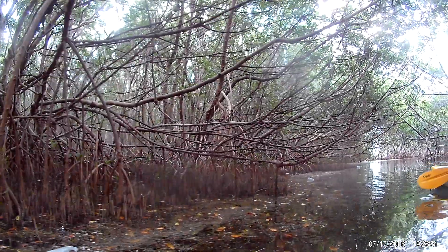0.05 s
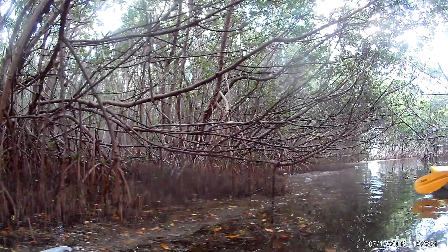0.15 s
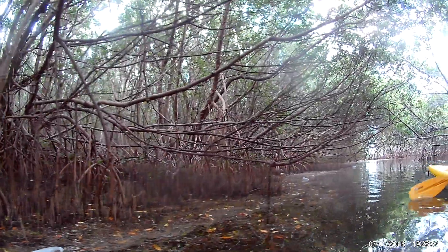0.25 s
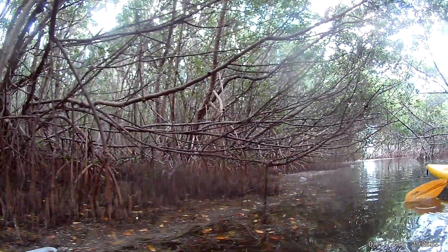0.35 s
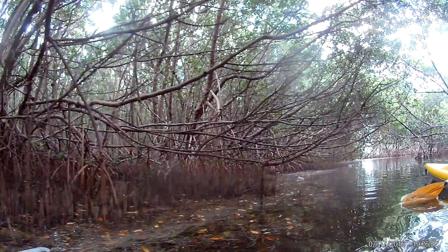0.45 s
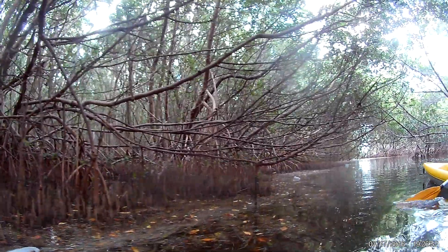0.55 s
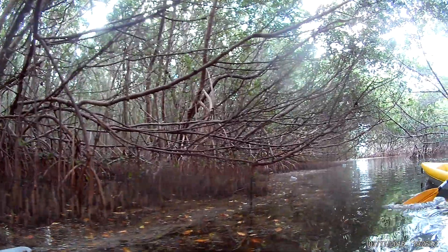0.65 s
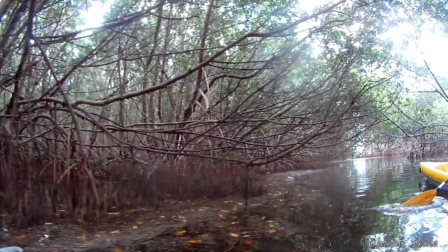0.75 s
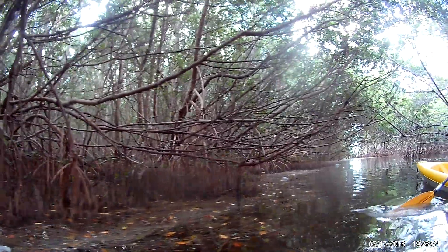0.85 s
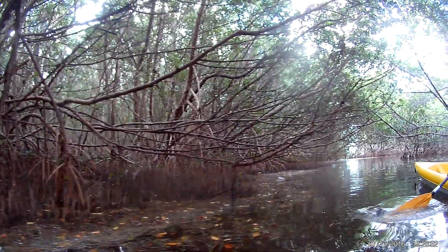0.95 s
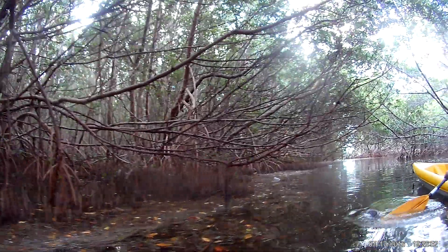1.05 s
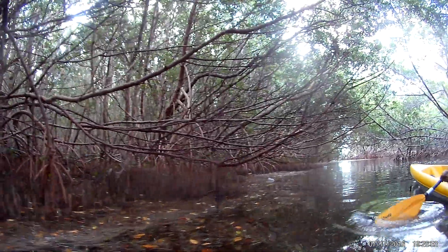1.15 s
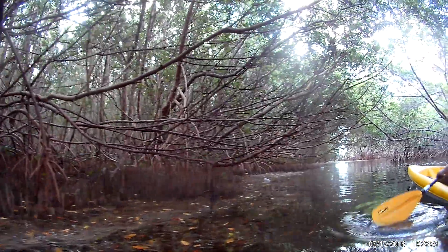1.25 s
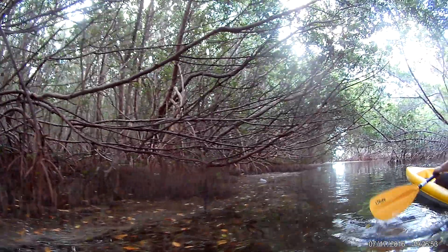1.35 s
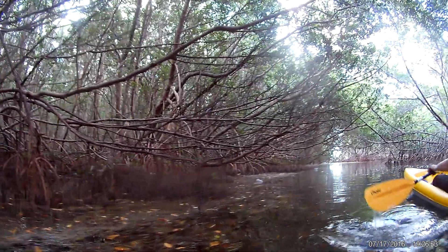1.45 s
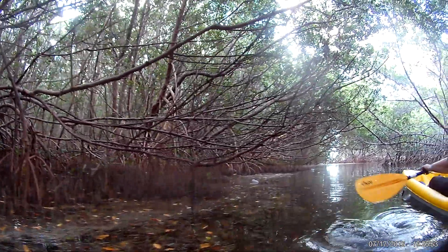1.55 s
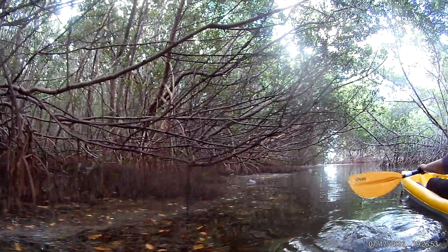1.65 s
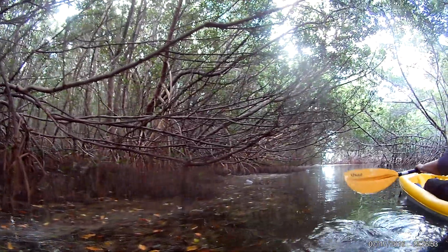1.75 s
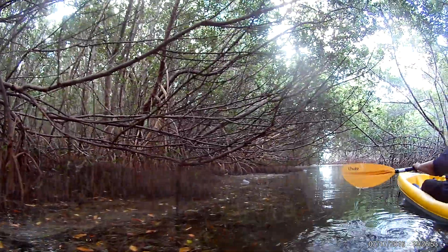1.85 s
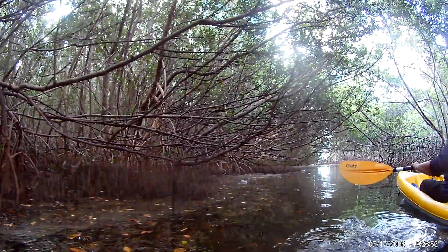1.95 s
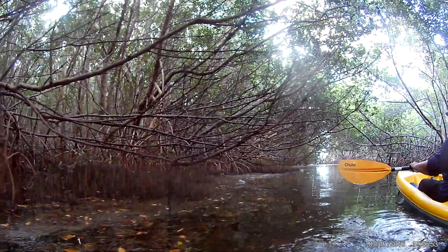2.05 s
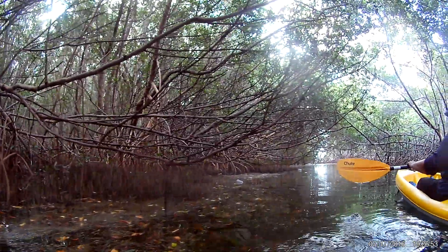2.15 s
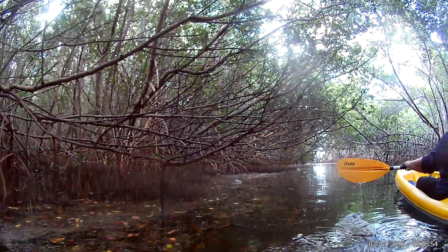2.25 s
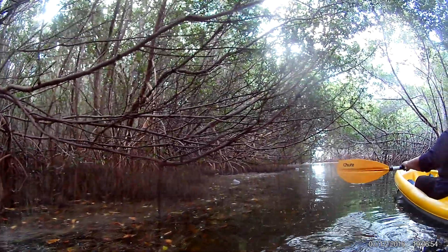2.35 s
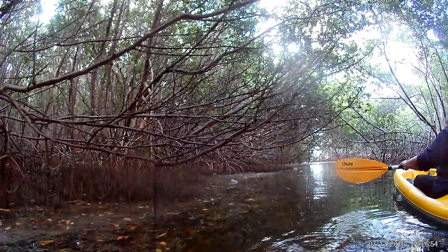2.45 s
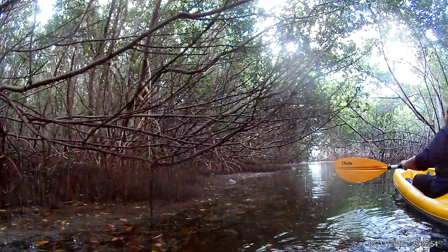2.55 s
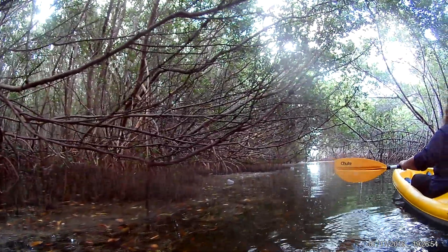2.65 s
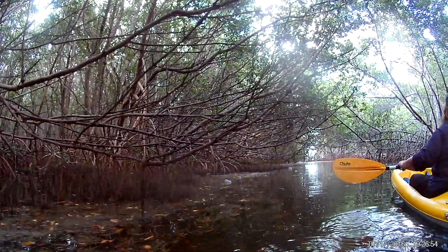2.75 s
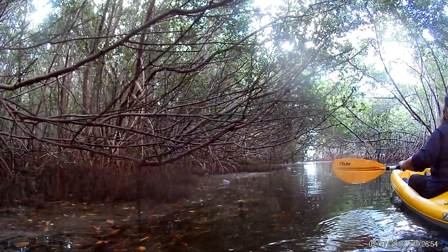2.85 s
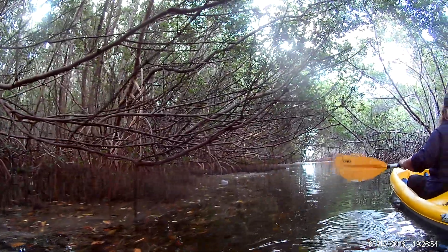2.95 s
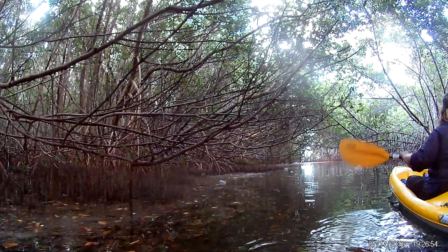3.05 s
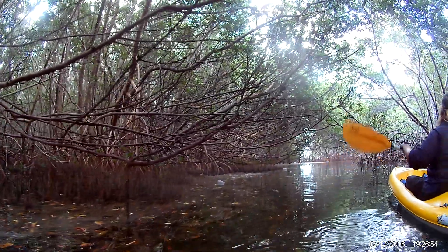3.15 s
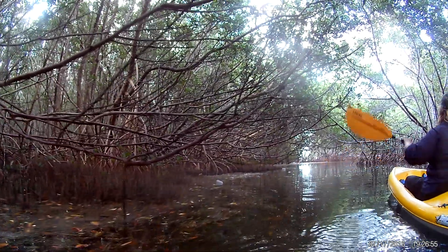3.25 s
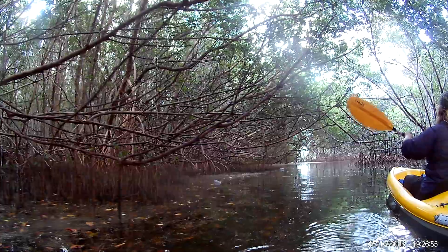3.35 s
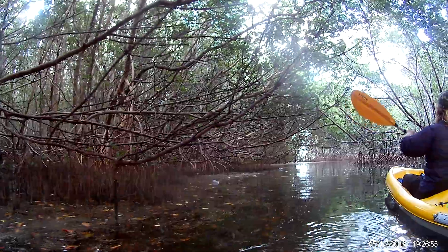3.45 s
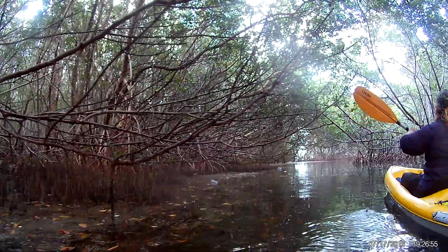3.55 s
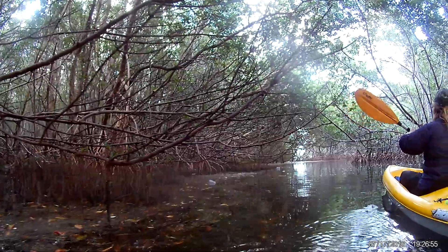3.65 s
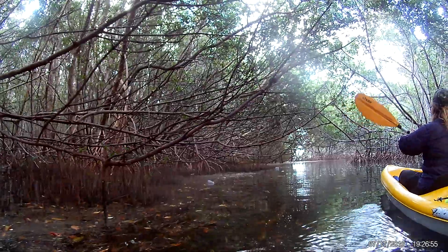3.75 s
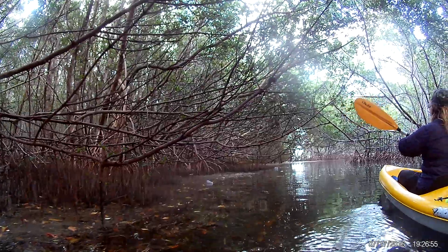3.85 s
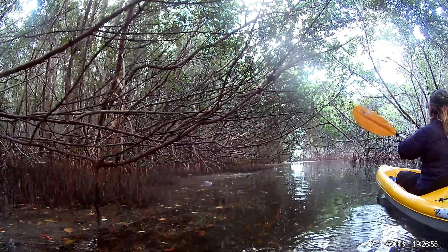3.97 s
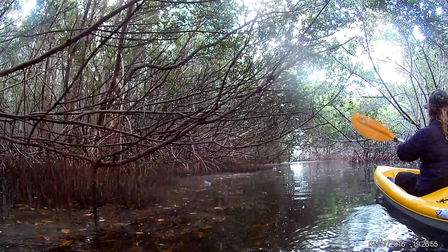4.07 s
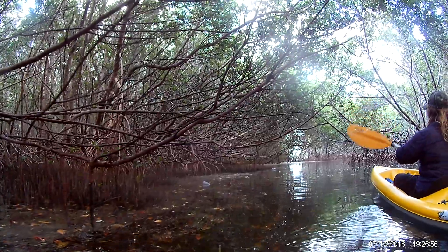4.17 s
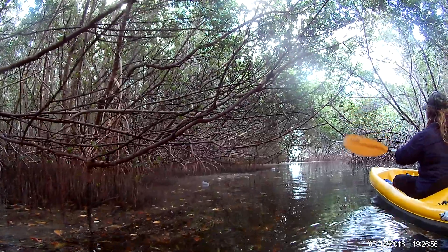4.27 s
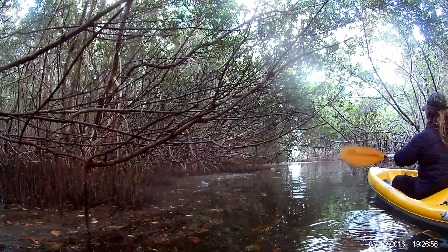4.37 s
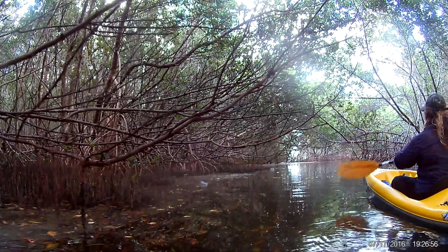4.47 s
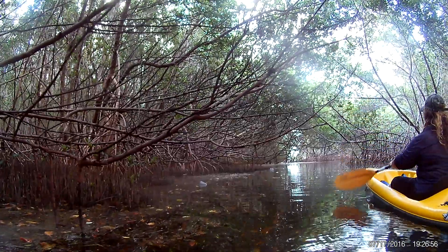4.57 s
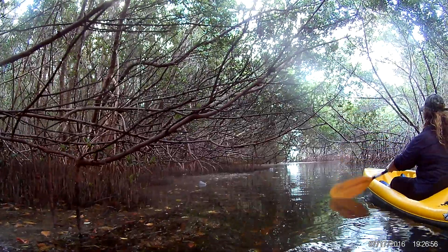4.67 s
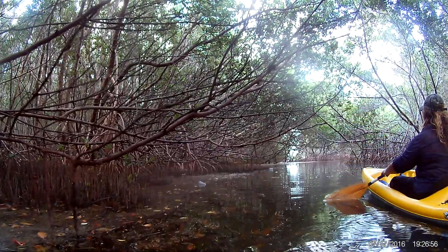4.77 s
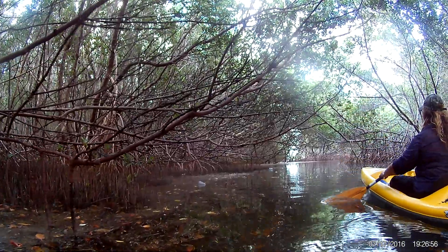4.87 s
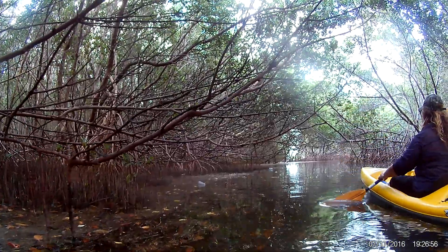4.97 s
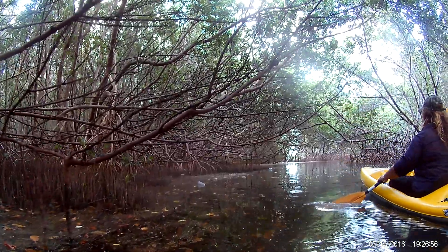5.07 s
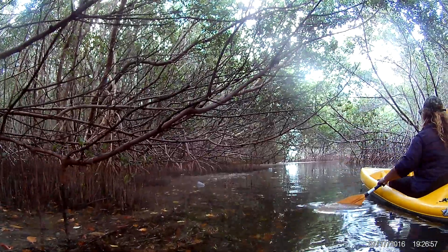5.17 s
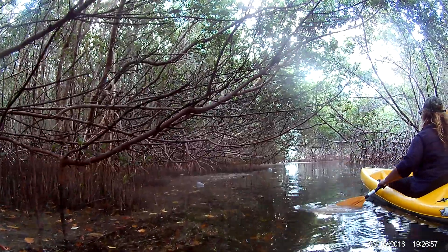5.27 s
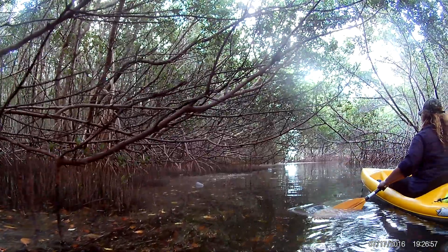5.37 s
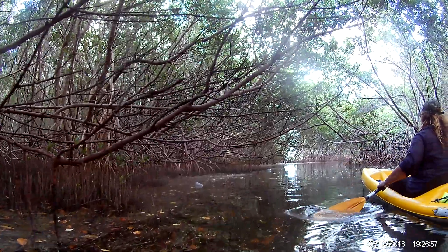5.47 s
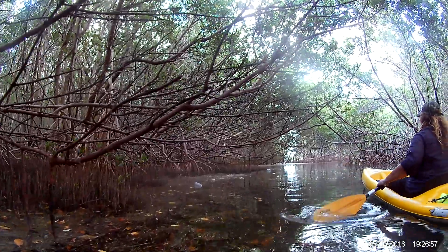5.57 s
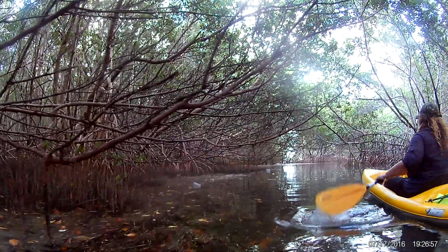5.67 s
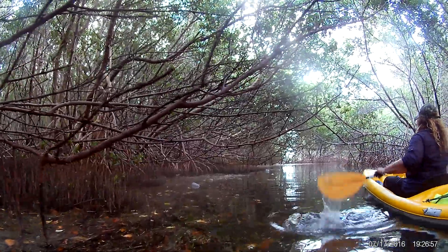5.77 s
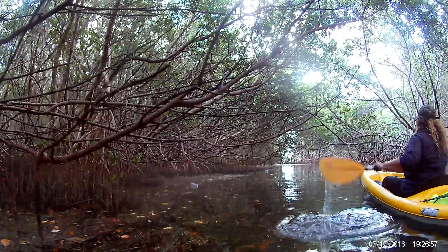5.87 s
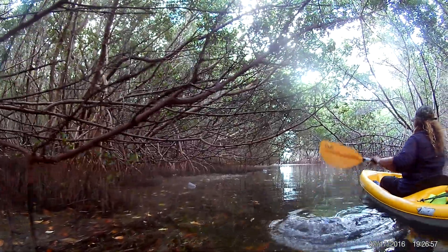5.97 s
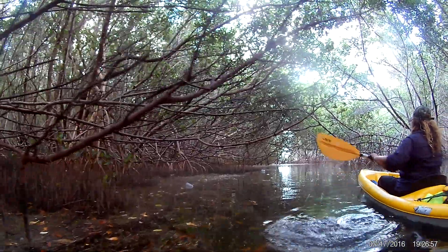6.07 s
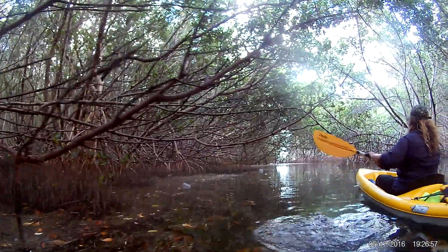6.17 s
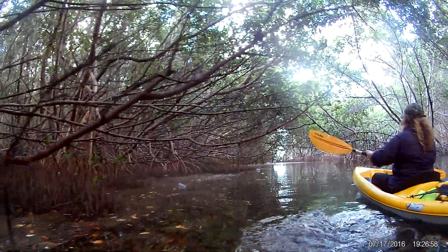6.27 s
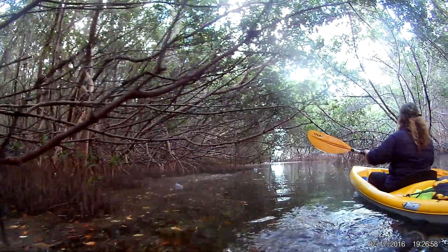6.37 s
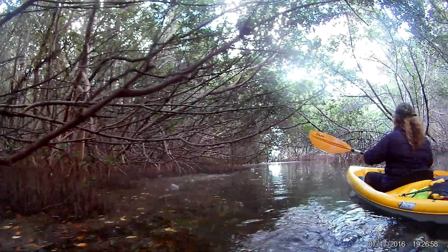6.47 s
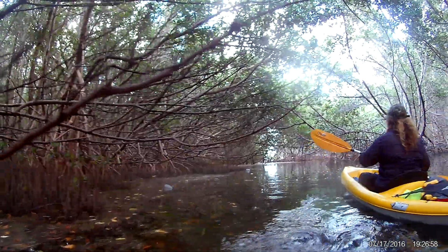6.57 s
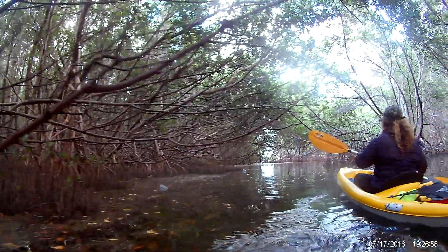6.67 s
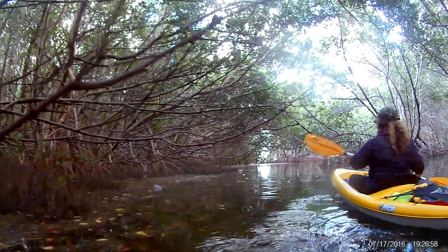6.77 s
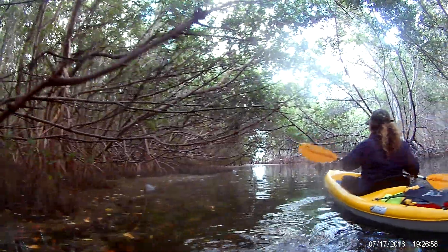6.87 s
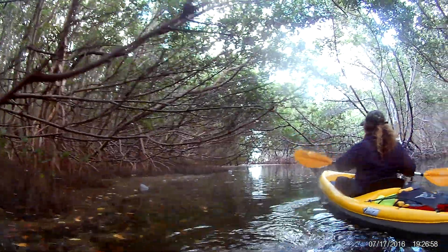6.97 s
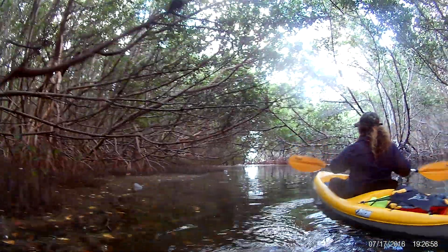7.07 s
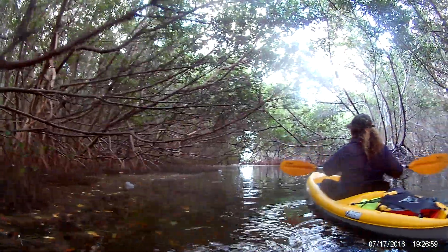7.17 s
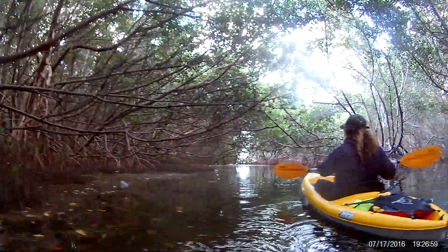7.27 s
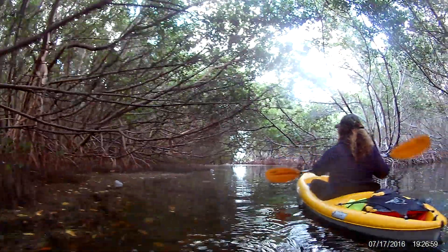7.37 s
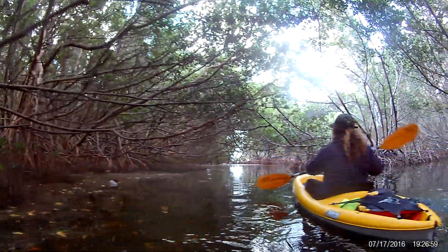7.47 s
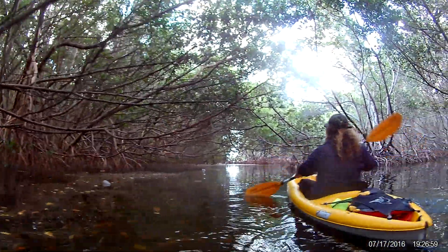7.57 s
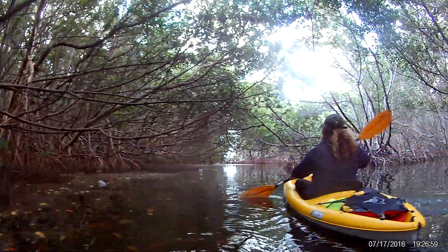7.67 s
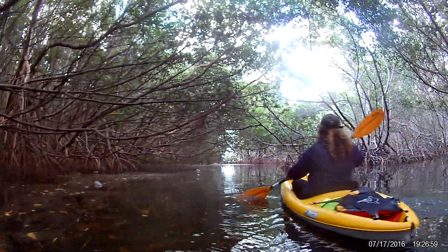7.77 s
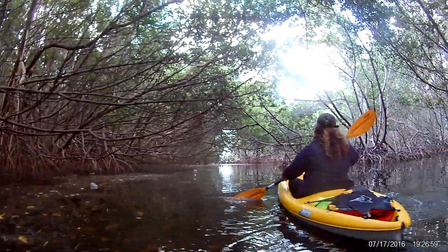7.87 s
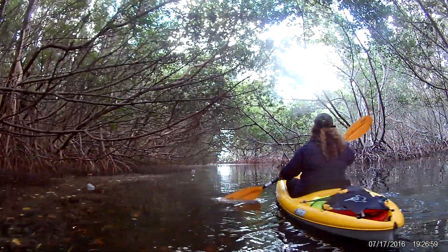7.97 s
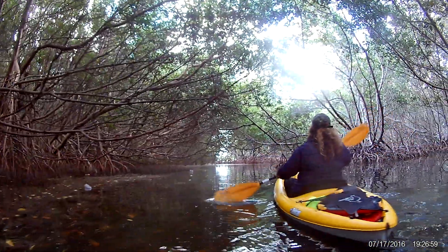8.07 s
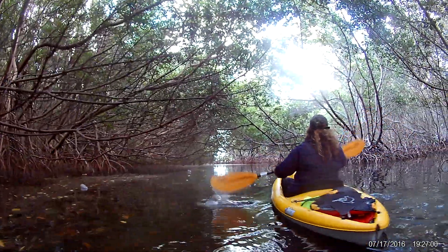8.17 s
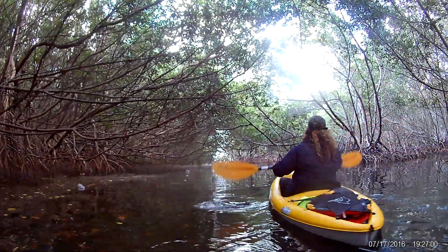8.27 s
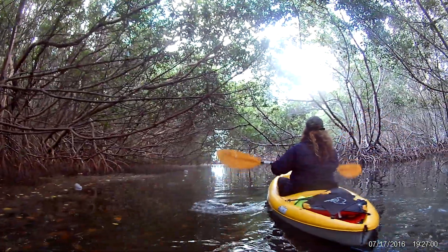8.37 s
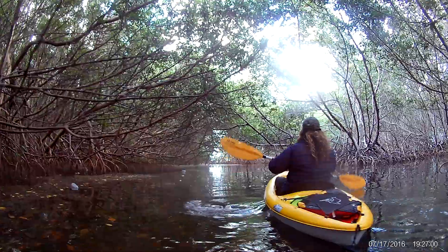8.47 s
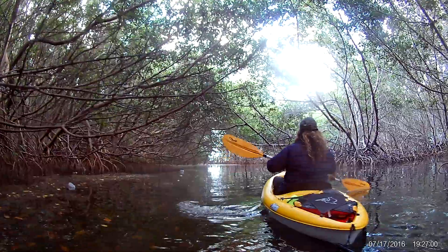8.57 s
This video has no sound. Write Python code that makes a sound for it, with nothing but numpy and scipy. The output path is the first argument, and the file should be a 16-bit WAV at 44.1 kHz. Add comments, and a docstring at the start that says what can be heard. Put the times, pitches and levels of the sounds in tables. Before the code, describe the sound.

Heard from a muffled camera case on a kayak deck in a still creek: water rubs along the hull at first, then a heavy hollow knock at 1.3 seconds. Paddle strokes gurgle and drip faintly. A sharp bright snap strikes just after 4 seconds, a duller thump and splash come near 5.8, then a deep soft bump around 7.2 and a light plop near 8. Low rumble, hum and faint hiss continue throughout.

```python
"""A still creek: a kayak drifts through it, heard by a camera in a sealed case on its deck.
Knocks ring the hollow plastic hull as decaying modes with a burst of noisy clatter.
Single gliding tones make plops, a low bump body, a sharp snap and high ticks; swarms of bubbles make
splashes, ticks and the bright edge of the big knock; paddle strokes gurgle and drip through the case.
Under them lie filtered noise for rumble, hiss and water along the hull, and wavering hum and whine."""
import sys
import numpy as np
from scipy import signal
from scipy.fft import rfft, irfft, next_fast_len
from scipy.io import wavfile
from scipy.ndimage import map_coordinates

SR = 44100
rng = np.random.default_rng(int(sys.argv[2]) if len(sys.argv) > 2 else 0)


def dump(signal):
    """Clip the signal to [-1, 1] and save it as 16-bit WAV at the path in sys.argv[1]."""
    limited = np.clip(np.atleast_2d(signal).T, -1, 1)
    pcm = np.round(limited * 32767).astype(np.int16)
    wavfile.write(sys.argv[1], SR, pcm)


N = 380141


def amp(db):
    """Decibels to gain."""
    return 10 ** (np.asarray(db) / 20)


def unit(x):
    """Scaled to rms 1."""
    return x / np.sqrt(np.mean(x ** 2) + 1e-20)


def along(points, hz):
    """A curve of (frequency, value) points, read on a log frequency axis."""
    point_hz, values = np.transpose(points)
    return np.interp(np.log(hz + 1), np.log(point_hz + 1), values)


def wobble(rate):
    """A smooth random curve through so many random knots a second."""
    knots = rng.standard_normal(int(N * rate / SR) + 4)
    return map_coordinates(knots, [np.arange(N) * rate / SR])


def filtered(x, response):
    """A sound shaped by a response of frequency, padded so that its end does not wrap round."""
    size = next_fast_len(len(x) + SR // 2)
    spectrum = rfft(x, size) * response(np.fft.rfftfreq(size, 1 / SR))
    return irfft(spectrum, size)[:len(x)]


def noise(spectrum):
    """Coloured noise of rms 1."""
    return unit(filtered(rng.standard_normal(N), lambda hz: amp(along(spectrum, hz))))


def add(track, s, sound):
    """Mix a sound into the track from time s."""
    start = max(0, round(s * SR))
    part = track[start:start + len(sound)]
    part += sound[:len(part)]


def softened(hz, cutoff_hz):
    """A soft contact cannot drive modes above its cut-off."""
    return 1 / np.sqrt(1 + (hz / cutoff_hz) ** 4)


def high_passed(x, edge_hz):
    """Little sounds below the given edge."""
    return signal.sosfilt(signal.butter(2, edge_hz, "high", fs=SR, output="sos"), x)


# Colour of the even hiss: (frequency [Hz], relative level per Hz [dB])
HISS_COLOUR = [(71, -40.5), (120, -1.5), (150, 0.5), (184, -4.5), (226, -4.5), (271, -5), (301, -8),
               (326, -6), (384, -9), (942, -16), (1360, -17.5), (2310, -23), (8200, -32), (13100, -32),
               (15800, -27.5)]
# Colour of the low rumble: (frequency [Hz], relative level per Hz [dB])
RUMBLE_COLOUR = [(10, -26), (30, -8.5), (50, -20), (66, 2), (78, 4.5), (90, -5), (110, -6), (140, -21),
                 (250, -38.5), (1000, -100)]
# Steady low hum: (frequency [Hz], rms level [dB], unsteadiness [ratio])
HUM_TONES = [(33.8, -68.5, 0.14), (72.9, -62.5, 0.38), (100.7, -67, 0.11), (166.3, -78.5, 0.52)]
# Thin electronic whine: (frequency [Hz], rms level [dB], unsteadiness [ratio])
WHINE_TONES = [(12818, -106, .1), (12898, -97, .1), (12979, -98, .1)]


def background(rumble_db=-64, rumble_sway_db=1.7, hiss_db=-67):
    """Noise makes an even hiss and a swaying rumble; wavering sines make the hum and the whine."""
    t = np.arange(N) / SR
    hiss = amp(hiss_db) * noise(HISS_COLOUR)
    rumble = amp(rumble_db + rumble_sway_db * wobble(5.9)) * noise(RUMBLE_COLOUR)
    out = hiss + rumble
    for hz, db, unsteady in HUM_TONES + WHINE_TONES:
        # a complex waver moves both strength and phase
        waver = 1 + unsteady * (wobble(2.2) + 1j * wobble(2.4))
        out += amp(db) * unit(np.real(waver * np.exp(2j * np.pi * hz * t)))
    return out


# Hull wall modes stirred by rubbing water: (frequency [Hz], width [Hz], level [dB])
WALL_MODES = [(93, 17, -8), (182, 67, -0.5), (246, 37, -11.5), (345, 53, -7.5), (580, 22, -16.5),
              (755, 37, -7.5), (1250, 87, -13)]
# Water rubbing along the hull: (time [s], level [dB])
DRAG_LEVEL = [(0, -63), (0.198, -61.5), (.45, -64.5), (.8, -71), (1.3, -72), (2.2, -100), (8.62, -85.5)]


def drag():
    """Water rubbing along the hull: noise through the resonances of its walls, rising and fading."""
    def walls(hz):
        """Summed resonances of the walls under a soft drive."""
        total = 0
        for centre, width, db in WALL_MODES:
            damping = 1j * hz * width
            total = total + amp(db) * damping / (centre * centre - hz * hz + damping)
        return total * softened(hz, cutoff_hz=720)

    level_db = np.interp(np.arange(N) / SR, *np.transpose(DRAG_LEVEL))
    return amp(level_db) * unit(filtered(rng.standard_normal(N), walls))


# What the case lets through: (frequency [Hz], gain [dB])
CASE_RESPONSE = [(100, 13.5), (600, 3.5), (1050, -0.5), (1300, 2.5), (1550, -2.5), (1900, 2.5),
                 (2500, -15.5), (5000, -28), (16000, -69)]


def through_case(x):
    """Muffled by the camera's case."""
    return filtered(x, lambda hz: amp(along(CASE_RESPONSE, hz)))


def bubble(hz, cycles):
    """One bubble: a soft start, a few cycles, a slight rise in pitch."""
    turns = hz * np.arange(SR // 40) / SR
    age = turns / cycles
    return age * np.exp(-2 * age) * np.sin(2 * np.pi * turns * (1 + 0.0071 * age))


def bubbling(rate, centre_hz, octaves, cycles, size_db):
    """An endless patter through the case: bubbles of random pitch and size at random moments, rms 1."""
    out = np.zeros(N)
    times = rng.uniform(0, N / SR, size=6000)
    draws = np.clip(rng.standard_normal((6000, 2)), -2, 2)
    count = max(1, int(rate * N / SR))
    for s, (pitch, size) in zip(times[:count], draws):
        hz = centre_hz * 2 ** (octaves * pitch)
        add(out, s, amp(size_db * size) * bubble(hz, cycles))
    return unit(through_case(out))


# Paddle strokes: (blade goes in [s], blade comes out [s], gurgle rms level [dB])
PADDLE_STROKES = [(0.368, 1.446, -78), (3.35, 4.105, -81.5), (5.2, 5.837, -78), (6.61, 7.298, -83.5),
                  (7.453, 7.96, -82), (8.16, 8.445, -82)]
SWELL_S, DRAIN_S = 0.12, 0.6  # the gurgle builds up with the pull and dies away as the blade drains
GURGLE_PER_S, GURGLE_HZ, GURGLE_OCTAVES = 420, 1586, 0.34  # small bubbles: rate, centre, spread
DRIPS_PER_S, DRIP_HZ, DRIP_OCTAVES = 16, 1602, 0.22  # drops off the blade: rate, centre, spread
DRIP_DB = -3.5  # drips over the gurgle


def trickle():
    """Water gurgles and drips round the blade during each stroke and drains off after it."""
    t = np.arange(N) / SR
    flow = np.zeros(N)
    for start, end, db in PADDLE_STROKES:
        swell = np.clip((t - start) / SWELL_S, 0, 1)
        drain = np.exp(-np.maximum(t - end, 0) / DRAIN_S)
        flow += amp(db) * swell * drain
    gurgle = bubbling(GURGLE_PER_S, GURGLE_HZ, GURGLE_OCTAVES, cycles=4.6, size_db=3.5)
    drips = bubbling(DRIPS_PER_S, DRIP_HZ, DRIP_OCTAVES, cycles=6.5, size_db=3.0)
    return flow * (gurgle + amp(DRIP_DB) * drips)


def swarm(half, centre_hz, rate, octaves=0.57, cycles=2.03, size_db=1.5):
    """Short bubbles crowded round one moment, heard through the case; rms 1 over the middle."""
    draws = rng.standard_normal((400, 3))[:max(4, int(2 * half * rate))]
    out = np.zeros(int(6 * half * SR) + SR // 40)
    for when, pitch, size in np.clip(draws, -2.5, 2.5):
        sound = amp(size_db * size) * bubble(centre_hz * 2 ** (octaves * pitch), cycles)
        add(out, (3 + when / np.sqrt(2)) * half, sound)  # the crowd centres on 3 half-lengths
    out = through_case(out)
    return out * np.sqrt(2 * half * SR) / np.linalg.norm(out)


# Splashes, brief ticks and the bright edge of the big knock, each a swarm of bubbles:
# (time [s], rms level [dB], half-length [s], centre pitch [Hz])
BURSTS = [(0.443, -58.5, 0.0021, 1450), (0.526, -64.5, 0.013, 1780), (0.785, -62.5, 0.004, 1340),
          (1.027, -58.5, 0.0027, 1130), (1.308, -38.5, 0.0038, 1610), (1.412, -59, 0.0066, 1670),
          (4.154, -38, 0.0017, 1170), (4.398, -47, .002, 1790), (5.813, -54.5, .026, 1620),
          (5.819, -48.5, 0.012, 571), (7.138, -65, 0.0064, 1290), (7.255, -51.5, 0.018, 1046),
          (7.91, -58.5, 0.015, 1480)]
BURST_PER_S = 3200  # bubble rate in a burst
FALL_S, FALL_DB = 0.06, -18  # drops fall back: delay, energy over a burst of their own length
FALL_HALF_S, FALL_HZ, FALL_PER_S = 0.019, 1630, 900  # their half-length, centre pitch and rate


def splashes_and_ticks():
    """Splashes, brief ticks and the bright edge of the big knock, each followed by falling drops."""
    out = np.zeros(N)
    for s, db, half, centre_hz in BURSTS:
        add(out, s - 3 * half, amp(db) * swarm(half, centre_hz, BURST_PER_S))
        # a longer burst drops more water
        fall_gain = amp(db + FALL_DB) * np.sqrt(half / FALL_HALF_S)
        drops = fall_gain * swarm(FALL_HALF_S, FALL_HZ, FALL_PER_S)
        add(out, s + FALL_S - 3 * FALL_HALF_S, drops)
    return out


# Single short tones (plops, a low bump body, a sharp snap, high ticks):
# (time [s], peak level [dB], pitch [Hz], half-length [s])
SHORT_TONES = [(0.758, -63, 1920, .004), (0.885, -59.5, 940, 0.0056), (0.964, -43, 326, 0.0022),
               (1.3054, -37.5, 780, 0.0027), (1.417, -49.5, 1150, 0.0036), (1.675, -57, 1390, 0.0026),
               (2.792, -61, 830, 0.0034), (2.811, -62.5, 1420, 0.0042), (4.114, -43.5, 1130, 0.0015),
               (4.15, -25, 655, .0022), (4.152, -54.5, 3340, 0.0012), (4.1545, -33, 1720, .0017),
               (4.401, -47.5, 1185, 0.0035), (5.069, -59, 800, .0025), (5.461, -62, 1280, 0.0039),
               (5.774, -52, 1350, 0.0078), (5.83, -43, 1224, 0.0052), (5.972, -67, 4130, 0.0018),
               (7.284, -45, 1390, 0.00067), (7.363, -60.5, 1300, .0035), (7.563, -58.5, 1290, 0.0032),
               (7.912, -46.5, 1335, 0.0036), (7.923, -49.5, 1200, 0.0031)]
TONE_RISE = 0.087  # octaves of glide per half-length


def short_tones(rough=0.21, spray_db=-13):
    """Plops, a low bump body, a sharp snap and high ticks: uneven tones gliding up, with a little hiss."""
    out, spray = np.zeros(N), noise(CASE_RESPONSE)
    for s, db, hz, half in SHORT_TONES:
        u = np.arange(-4, 4, 1 / (half * SR))  # time from the peak in half-lengths
        phase = 2 * np.pi * np.cumsum(hz * 2 ** (TONE_RISE * u)) / SR
        flutter = rough * map_coordinates(rng.standard_normal(12), [u - u[0]])  # radians
        tone = np.sin(phase - phase[len(u) // 2] + flutter)
        hiss = amp(spray_db) * spray[round(s * SR):][:len(u)]
        swell = np.exp(-u ** 2 / 2)
        add(out, s + u[0] * half, amp(db) * swell * (tone + hiss))
    return out


# Slow flexing of the hull: (time [s], peak level [dB], frequency [Hz], half-length [s])
HULL_SWAYS = [(7.213, -51, 49, 0.049), (7.333, -50.5, 36, 0.041)]


def sway():
    """A push through the water flexes the whole hull for a few slow cycles."""
    t = np.arange(N) / SR
    out = np.zeros(N)
    for s, db, hz, half in HULL_SWAYS:
        swell = np.exp(-((t - s) / half) ** 2 / 2)
        out += amp(db) * swell * np.sin(2 * np.pi * hz * (t - s))
    return out


# Colour of the dense upper hull modes: (frequency [Hz], relative level [dB])
CLATTER_COLOUR = [(60, 6.5), (120, -1.5), (300, -0.5), (450, 1), (750, -9), (1000, -6), (1300, -7),
                  (1900, -11), (2400, -23), (5000, -45)]
# How long they ring: (frequency [Hz], time to fall 60 dB [s])
CLATTER_T60 = [(120, 0.55), (300, 0.18), (700, 0.12), (1400, 0.13), (4000, 0.051)]


def clatter(cutoff_hz, lowest_hz=105):
    """The dense modes of the hull after a blow: noise that dies at a rate of its own in each band."""
    hz, t, bands = signal.stft(rng.standard_normal(SR // 2), SR, nperseg=512)
    colour = amp(along(CLATTER_COLOUR, hz)) * softened(hz, cutoff_hz)
    fade = amp(-60 * t / along(CLATTER_T60, hz)[:, None])
    shaped = bands * unit(colour)[:, None] * fade
    tail = signal.istft(shaped, SR, nperseg=512)[1][:SR // 2]
    return high_passed(tail, lowest_hz)


# Single modes of the hull: (frequency [Hz], level [dB], time to fall 60 dB [s])
HULL_MODES = [(55.2, -25, 1), (81.7, -3, 0.49), (140.3, -5, 0.42), (175, -18, 0.35), (198.4, -14.5, 0.25),
              (239.2, -10.5, 0.24), (308, -2.5, 0.082), (357, -16, 0.19), (476, -28.5, 0.22),
              (795, -22, 0.25), (865, -35, 0.2), (1170, -15, 0.14), (1340, -34, 0.53), (2000, -27, 0.18)]
# Blows on the hull: (time [s], level [dB], hardness as cut-off [Hz], boom of the lowest modes [dB],
# rebound delay [s], rebound over the blow [dB])
HULL_BLOWS = [(0.931, -50.5, 594, -12, 0.031, 6), (0.963, -48, 345, -11.5, .033, 7.5),
              (1.302, -34.5, 1980, -1, 0.011, -7), (1.307, -22, 780, -4, .0185, -2.5),
              (4.149, -36, 900, -11.5, 0.011, -7), (4.394, -55.5, 1500, -16.5, 0.011, -24),
              (5.717, -39, 338, -9.5, .024, 1.5), (7.129, -49.5, 1100, -13.5, 0.016, 0),
              (7.179, -36, 75, 7.5, 0.015, -14), (7.903, -48.5, 240, -1.5, 0.01, 3)]
CLATTER_DB, CLATTER_PER_BOOM = -13, -1.24  # a blow that booms more clatters less (dB, dB per dB)
REBOUND_SOFTNESS, REBOUND_BOOM_DB = 0.33, 8  # second contact: cut-off over the first, extra boom


def knocks(attack_s=0.00081, scatter_db=1, low_cut_hz=42):
    """Each blow rings the hull with a deep boom, wall modes and a short clatter; a duller rebound follows."""
    out, t = np.zeros(N), np.arange(SR // 2) / SR
    hz, mode_db, t60 = np.transpose(HULL_MODES)
    modes = np.sin(2 * np.pi * hz[:, None] * t) * amp(-60 * t / t60[:, None])
    modes[1::2] *= -1  # neighbouring modes swing opposite ways at the camera
    deep = hz < 100

    def contact(cutoff_hz, boom_db, rattle_db):
        """One touch on the hull, each mode struck a little differently."""
        scatter = scatter_db * rng.standard_normal(len(hz))
        strength = amp(mode_db + boom_db * deep + scatter)
        ring = (strength * softened(hz, cutoff_hz)) @ modes
        onset = 1 - np.exp(-t / attack_s)
        return (ring + amp(rattle_db) * clatter(cutoff_hz)) * onset

    for s, db, cutoff_hz, boom_db, delay, rebound_db in HULL_BLOWS:
        rattle_db = CLATTER_DB + CLATTER_PER_BOOM * boom_db
        blow = contact(cutoff_hz, boom_db, rattle_db)
        rebound = contact(cutoff_hz * REBOUND_SOFTNESS, boom_db + REBOUND_BOOM_DB, rattle_db)
        add(out, s, amp(db) * blow)
        add(out, s + delay, amp(db + rebound_db) * rebound)
    return high_passed(out, low_cut_hz)


def scene(hull_echo_db=3):
    """All layers together; the tones, bursts and trickle linger briefly in the hollow hull."""
    small_sounds = short_tones() + splashes_and_ticks() + trickle()
    tail = clatter(cutoff_hz=6000)
    tail_peak = np.abs(rfft(tail)).max()  # strongest spectral magnitude of the tail, used to scale it
    echo = signal.fftconvolve(small_sounds, tail / tail_peak)[:N]
    lingering = small_sounds + amp(hull_echo_db) * echo
    return (background() + drag() + lingering + sway() + knocks())[None]


def record(dry, top_hz=15800):
    """The camera keeps nothing above its band limit."""
    return filtered(dry[0], lambda hz: hz < top_hz)[None]


dry = scene()
out = record(dry)
dump(out)
```